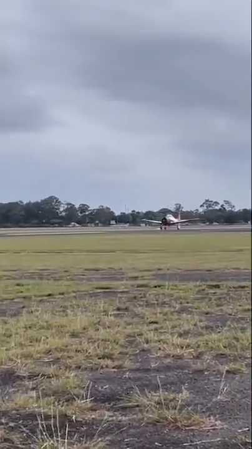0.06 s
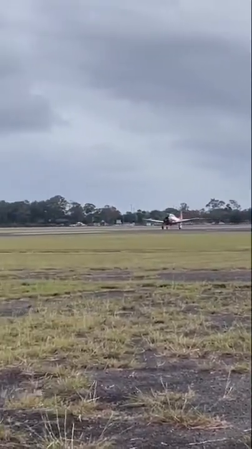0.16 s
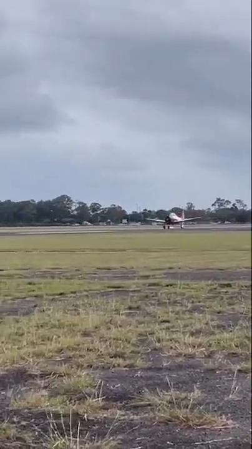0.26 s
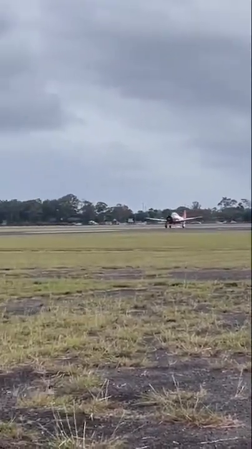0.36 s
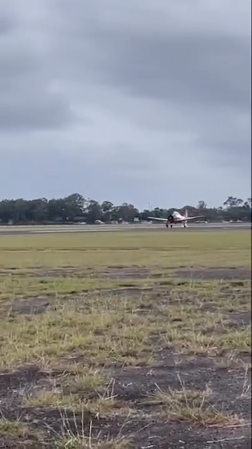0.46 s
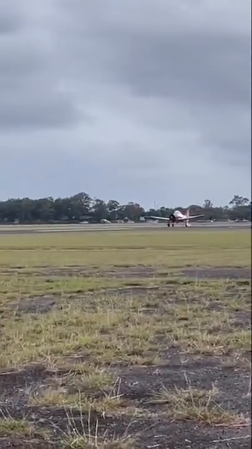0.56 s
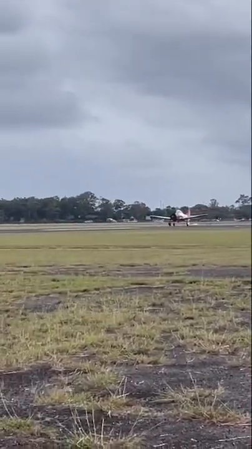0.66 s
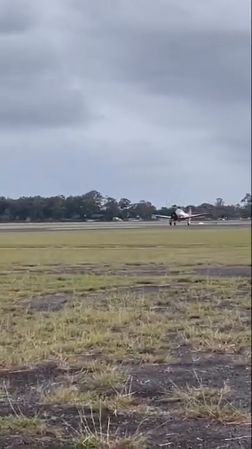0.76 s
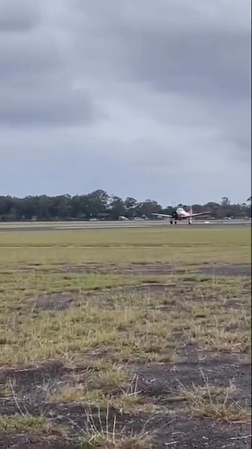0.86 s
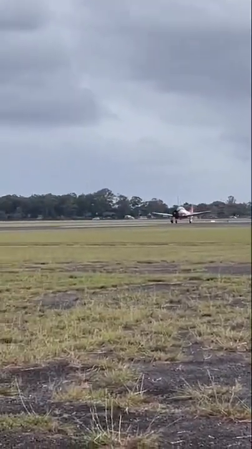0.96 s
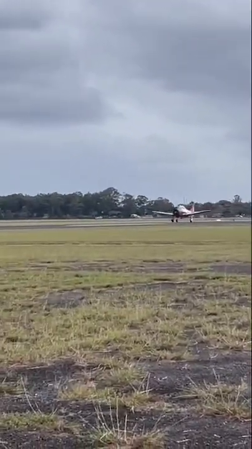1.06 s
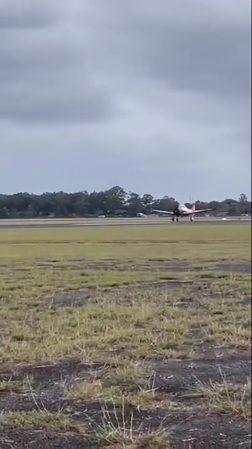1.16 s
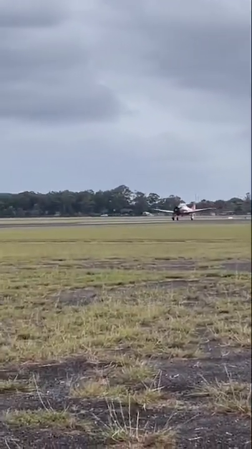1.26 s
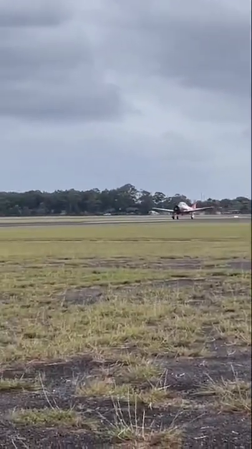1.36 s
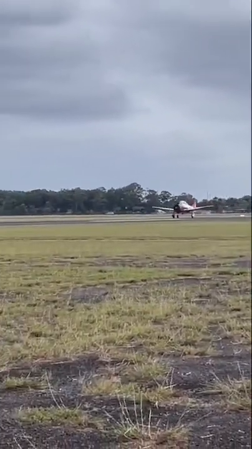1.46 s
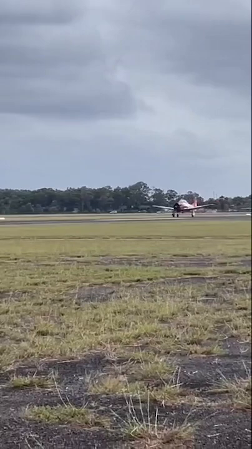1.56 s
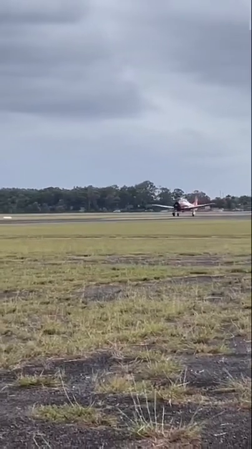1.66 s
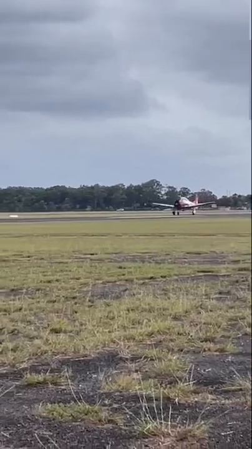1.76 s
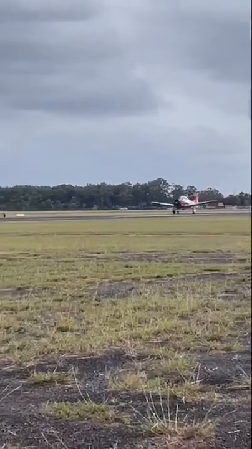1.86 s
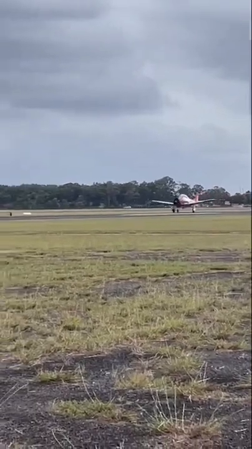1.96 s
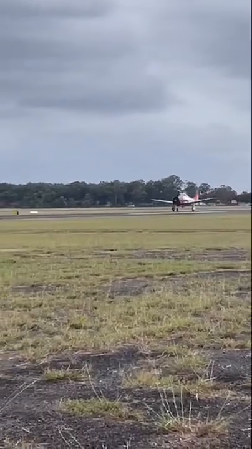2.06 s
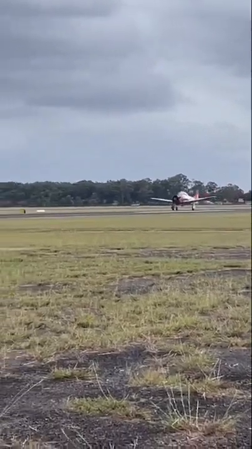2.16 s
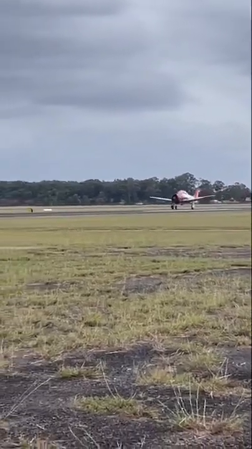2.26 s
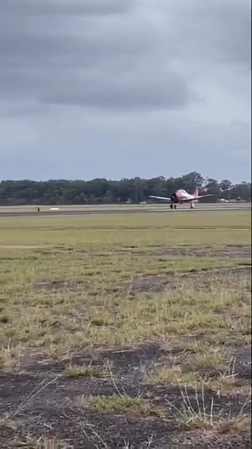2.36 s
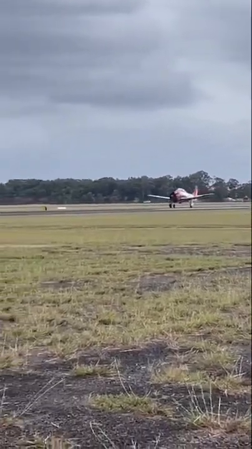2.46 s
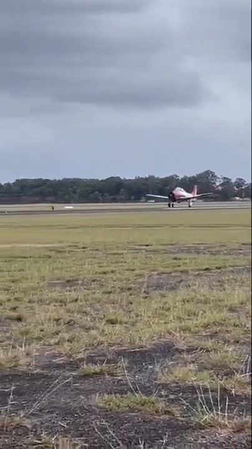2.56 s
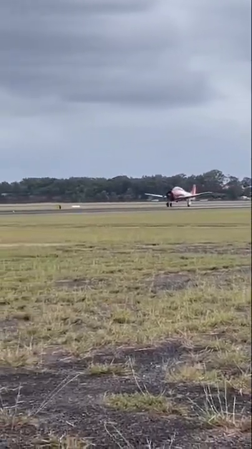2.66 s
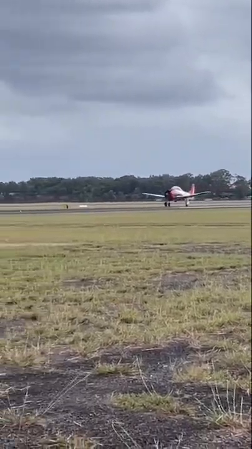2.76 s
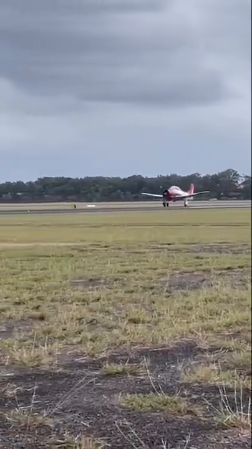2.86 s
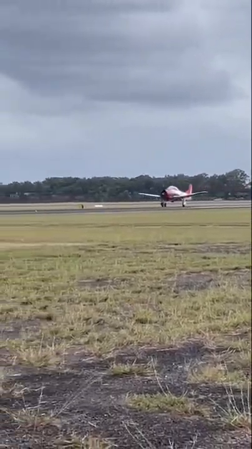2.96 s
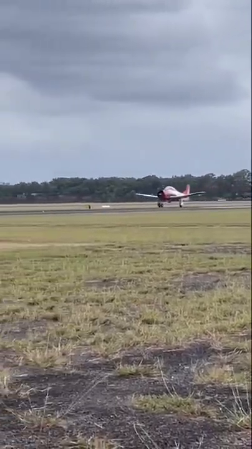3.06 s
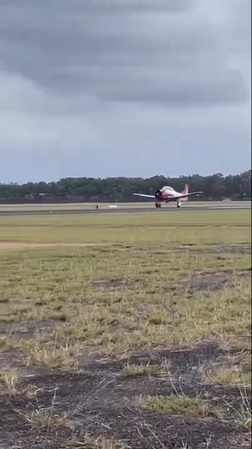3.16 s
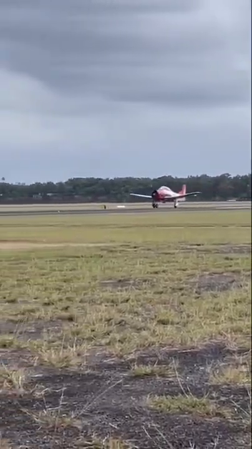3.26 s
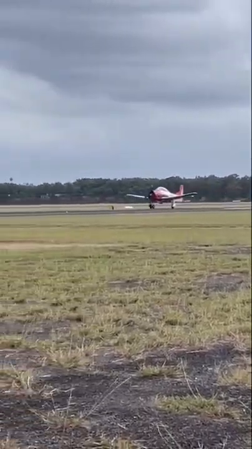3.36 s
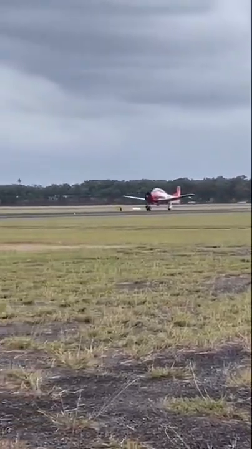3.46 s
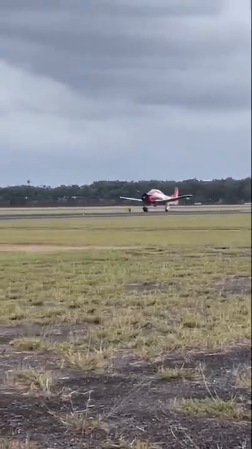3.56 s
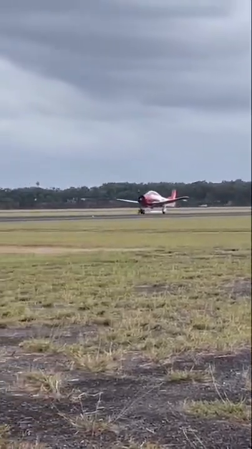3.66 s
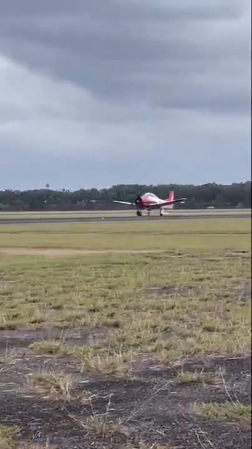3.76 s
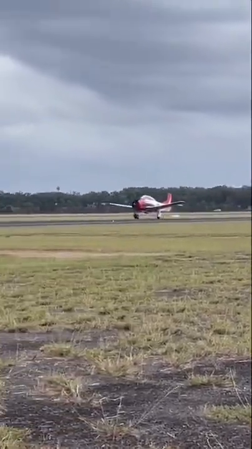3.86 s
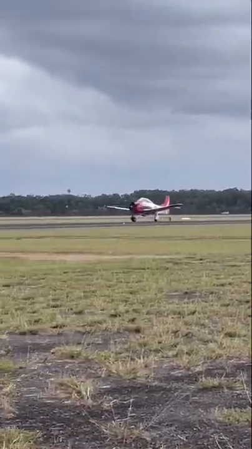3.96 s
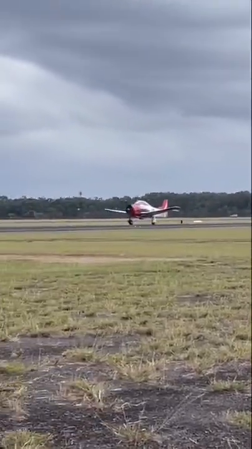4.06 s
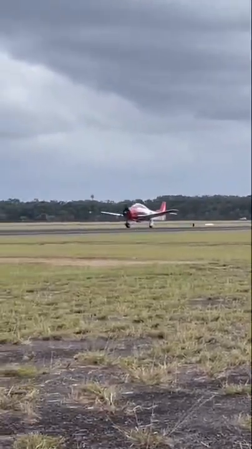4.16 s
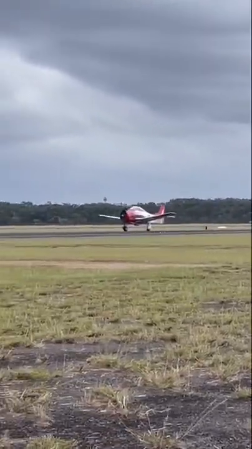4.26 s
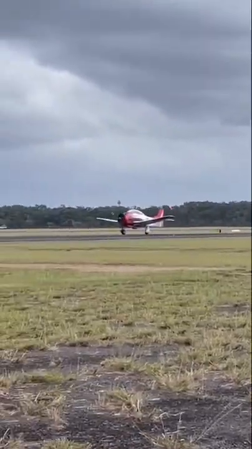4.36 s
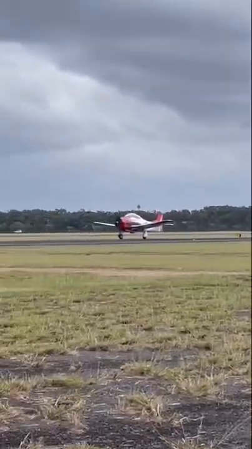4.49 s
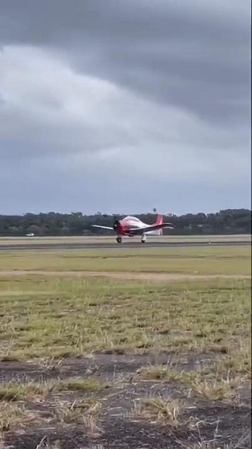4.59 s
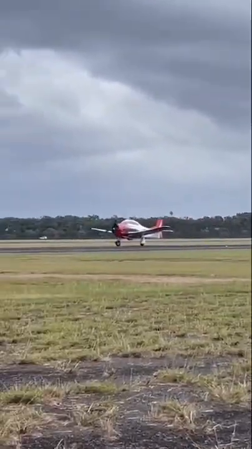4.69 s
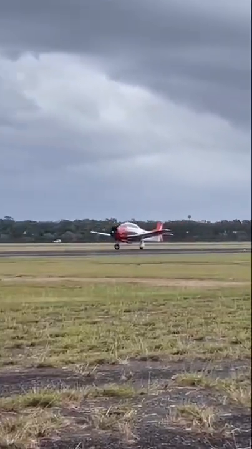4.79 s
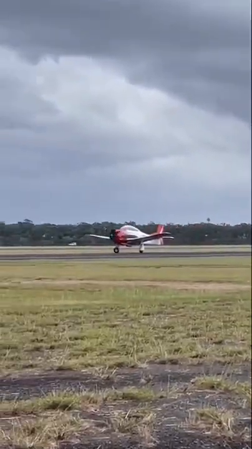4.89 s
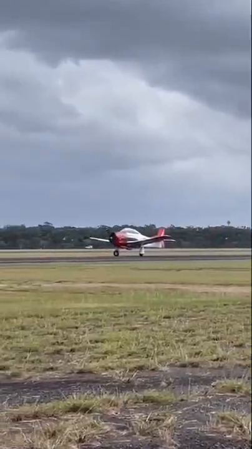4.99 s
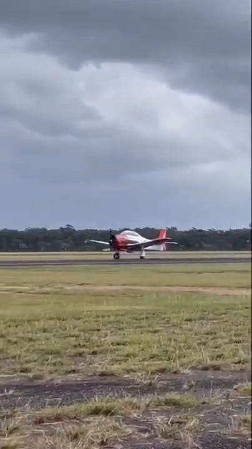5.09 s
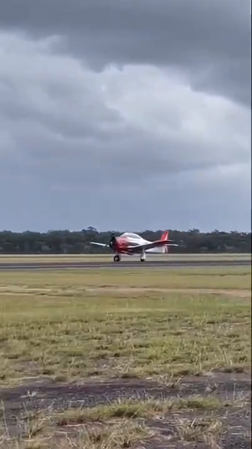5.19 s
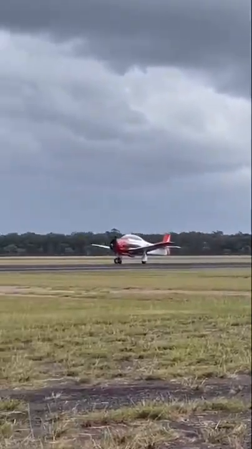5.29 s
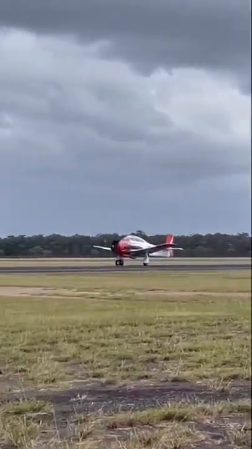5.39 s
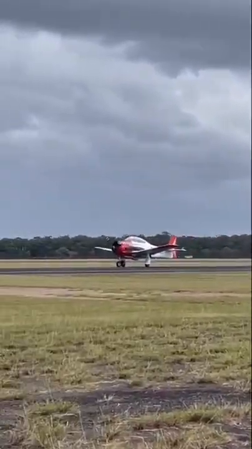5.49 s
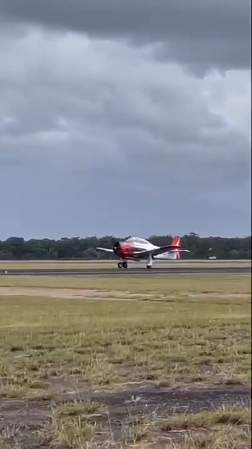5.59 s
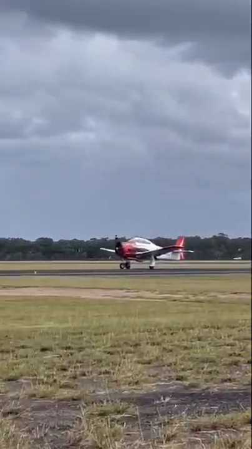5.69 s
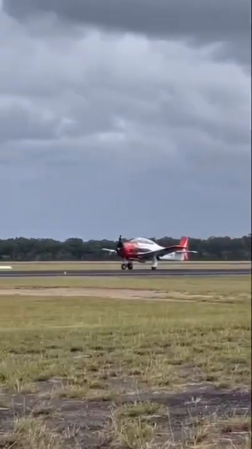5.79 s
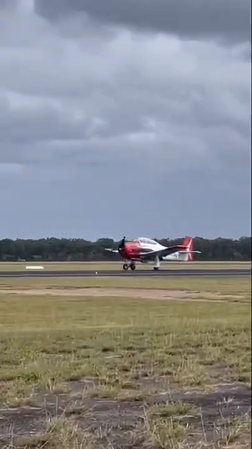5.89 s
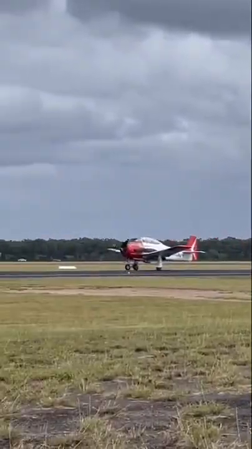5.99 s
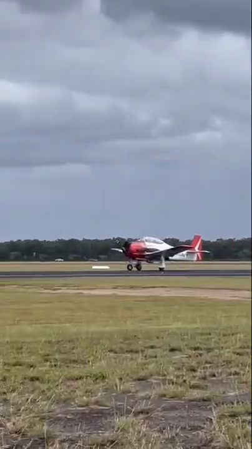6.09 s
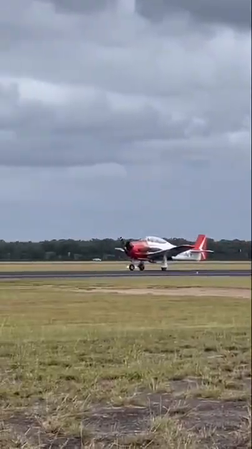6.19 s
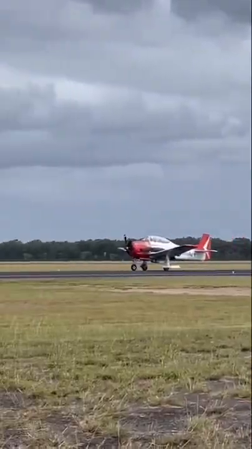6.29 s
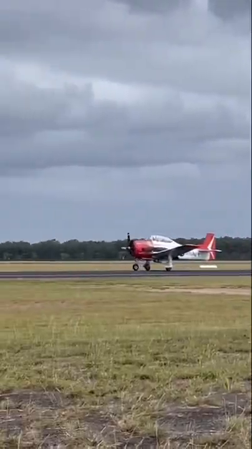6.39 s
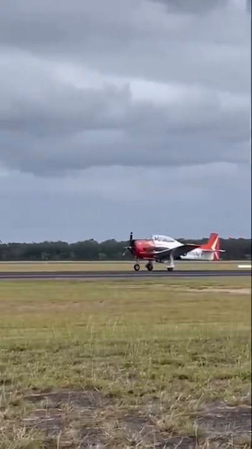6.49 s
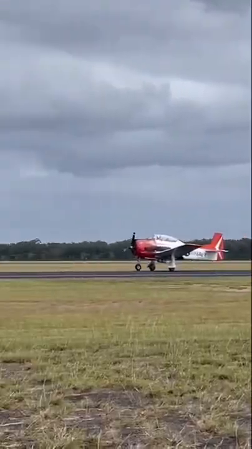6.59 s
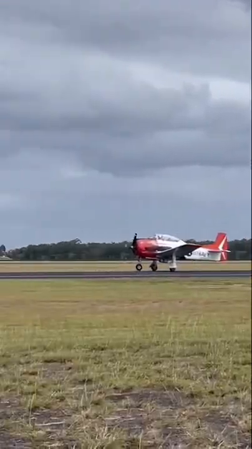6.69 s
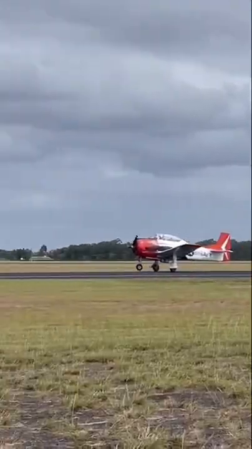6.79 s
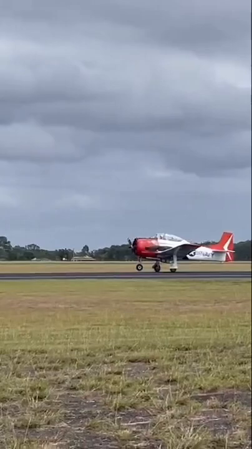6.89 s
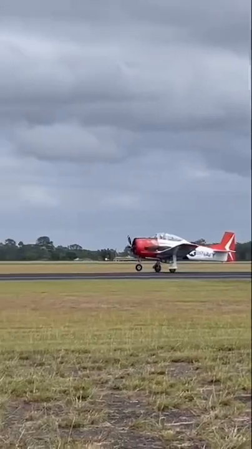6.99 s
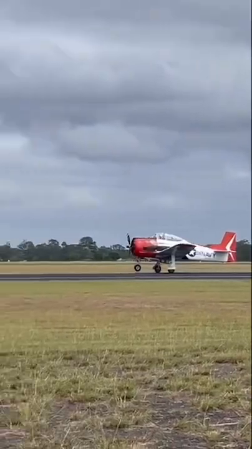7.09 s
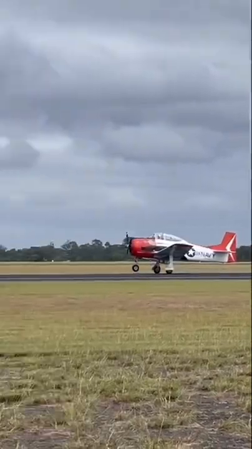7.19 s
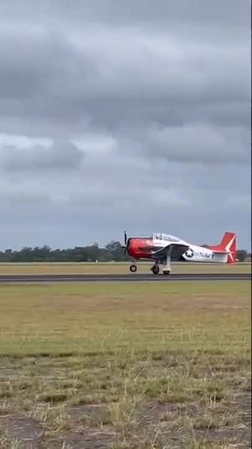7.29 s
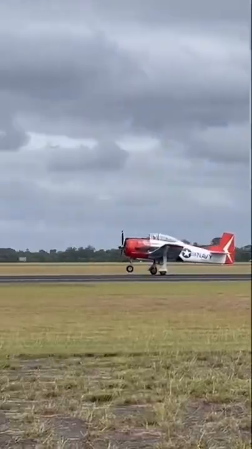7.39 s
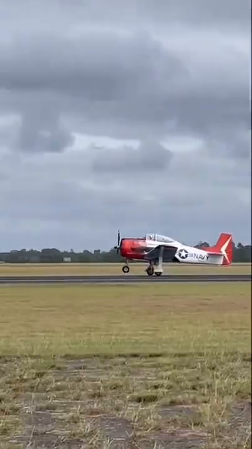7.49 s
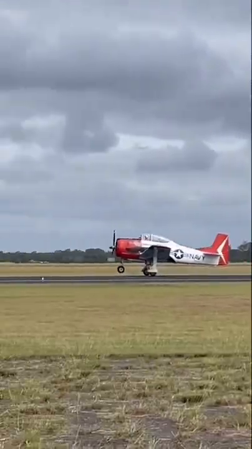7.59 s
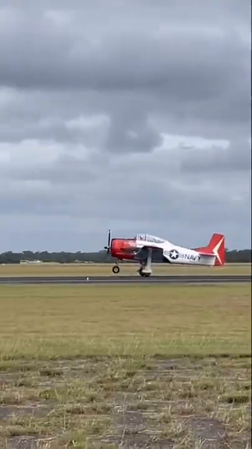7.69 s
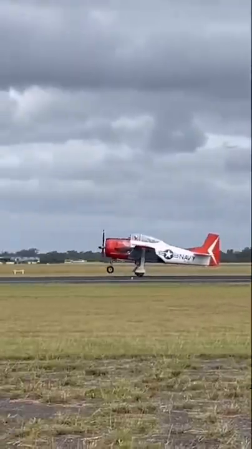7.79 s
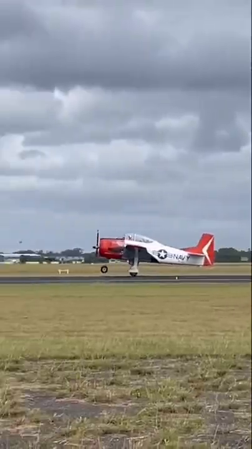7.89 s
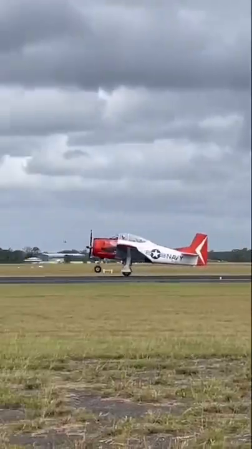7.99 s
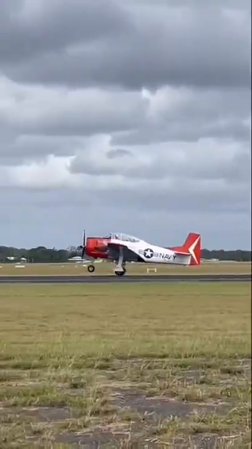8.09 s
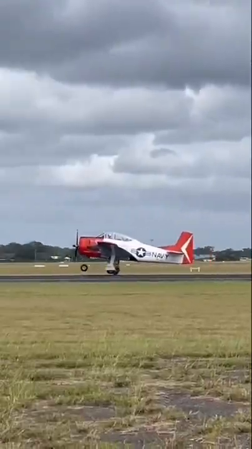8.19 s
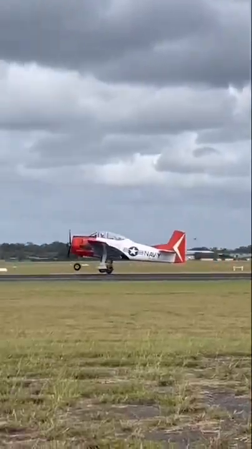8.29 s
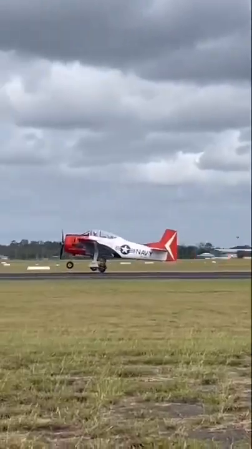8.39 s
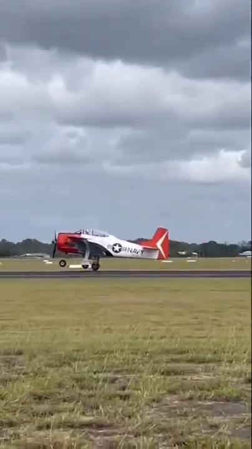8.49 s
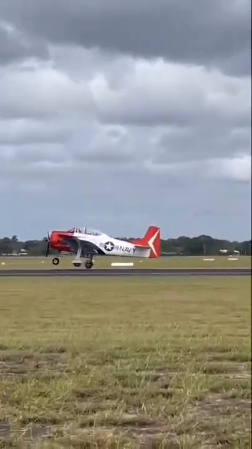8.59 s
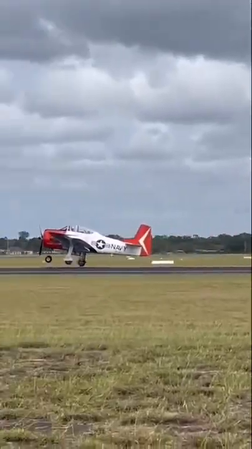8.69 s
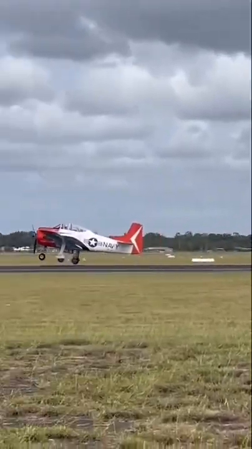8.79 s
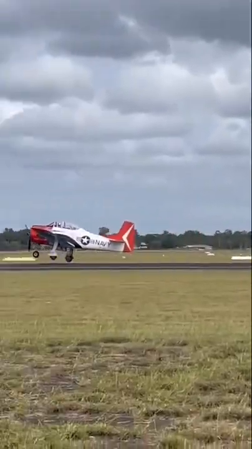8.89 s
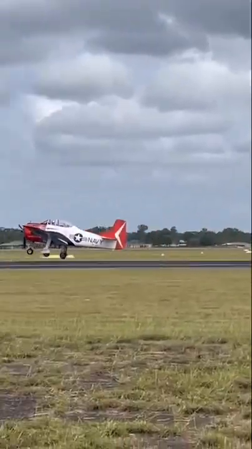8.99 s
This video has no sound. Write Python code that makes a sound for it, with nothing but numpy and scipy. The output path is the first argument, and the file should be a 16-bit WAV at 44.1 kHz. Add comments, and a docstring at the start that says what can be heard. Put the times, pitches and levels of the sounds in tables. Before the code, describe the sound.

A single-propeller aircraft with a big radial piston engine accelerates past a listener beside a runway. Gusts flutter and thump on the microphone before the engine takes over after four seconds. Its steady low drone grows into a full buzzing roar with hissing exhaust puffs. More wind thumps strike near the pass; afterwards the propeller wash fades, the pitch drops slightly, and a wavering, lumpy exhaust throb remains.

```python
"""A droning aeroplane with a nine-cylinder radial engine nears, passes close by and recedes on its take-off run.
Blade harmonics make the propeller drone; half-order tones and puffs of hiss make the exhaust throb and rasp
once a turn as the near cylinders fire. Orders of the engine whine ahead of it, and shaped noise
gives the roar of propeller wash. Wind buffets the microphone with noise, deep rumble and short thuds."""
import sys
import numpy as np
from scipy import signal
from scipy.fft import rfft, irfft
from scipy.io import wavfile
from scipy.ndimage import uniform_filter1d

SR = 44100
rng = np.random.default_rng(int(sys.argv[2]) if len(sys.argv) > 2 else 0)


def materialize(psi):
    """Save the field psi as 16-bit PCM at rate SR to the path in sys.argv[1].

    A 1-D psi becomes a single channel; in a 2-D psi each row is a channel.
    """
    bounded = np.clip(np.atleast_2d(psi).T, -1, 1)
    quanta = np.round(bounded * 32767).astype(np.int16)
    wavfile.write(sys.argv[1], SR, quanta)


N = 399105
TIME = np.arange(N) / SR
BINS = np.fft.rfftfreq(512, 1 / SR)  # Hz
FRAMES = np.arange(N // 128 + 5) * 128 / SR  # s

# Steady wind at the microphone. Each row: time in seconds, buffeting in dB before a shared lift, rumble in dB.
WIND_LEVELS = [(0, -47, -32.5), (1.22, -48, -29.5), (1.35, -32, -27), (1.75, -33.5, -26.5),
               (2.05, -34, -24), (2.45, -48, -34.5), (2.85, -45, -29), (3.15, -29.5, -23.5),
               (3.7, -35, -24), (4.05, -36.5, -29.5), (4.55, -36.5, -26), (5.15, -35.5, -26.5),
               (5.65, -33, -30), (6.4, -33.5, -26), (7.17, -39, -26), (7.26, -23.5, -21), (7.45, -25, -24),
               (7.75, -24.5, -23), (8.1, -29, -47), (9.05, -31, -44)]
# Swells of wind. Each row: start in seconds, length in seconds, level in dB before the buffet lift
# or rumble trim, brightness in dB before its spectral weighting.
WIND_SWELLS = [(0.065, 0.047, -38, -24), (0.382, 0.037, -26, -5), (0.447, .02, -30, -8),
               (0.547, 0.072, -26, -4), (0.665, 0.081, -28, 2), (0.771, 0.096, -31.5, 1.5),
               (0.888, .006, -23, -3), (0.915, 0.07, -28.5, 3), (1.012, .02, -33, 2),
               (1.041, 0.036, -28, 3), (1.127, 0.0077, -27.5, 8), (1.161, 0.023, -28.5, 3.5),
               (1.266, 0.04, -29, 1), (1.304, 0.13, -28, 5), (1.468, 0.015, -32, 0),
               (1.52, 0.031, -27.5, 6), (1.563, 0.031, -24, 6.5), (1.606, 0.029, -24, 6.5),
               (1.65, 0.064, -41, 9), (1.72, 0.025, -33, 4), (1.77, 0.053, -28.5, 2),
               (1.837, 0.024, -22, 5.5), (1.869, 0.045, -34, 8), (1.928, 0.027, -26, 2.5),
               (1.982, 0.04, -33, 7.5), (2.065, 0.028, -30.5, 8), (2.096, 0.078, -31, 7),
               (2.249, 0.012, -31, 7), (2.297, .055, -40, 8), (2.515, 0.012, -35.5, 11),
               (2.622, 0.093, -37, 4), (2.732, 0.022, -32.5, 10.5), (2.914, .01, -34.5, 8),
               (2.984, 0.058, -28, -0.5), (3.049, 0.019, -16, -2), (3.179, 0.0078, -24, -6),
               (3.26, 0.047, -21.5, -2.5), (3.418, 0.039, -28, 0), (3.51, .02, -32, 4),
               (4.186, 0.048, -23.5, -6), (4.898, 0.022, -23.5, -6), (5.175, 0.019, -22.5, -1.5),
               (5.284, 0.04, -21, -3), (7.236, 0.35, -40, 2), (8.112, 0.19, -26, 4.5),
               (8.396, 0.038, -26, 6.5), (8.567, 0.085, -28.5, 8), (8.71, 0.12, -25.5, 4)]
# Spectrum of the buffeting. Each row: frequency in Hz, relative level in dB per Hz.
BUFFET_SPECTRUM = [(30, -24), (70, 7), (130, 9.5), (220, 4.5), (350, 3.5), (650, 0.5), (1000, -6.5),
                   (1300, -11), (1650, -17), (2500, -35), (5000, -86), (9000, -91)]
# Spectrum of the wind rumble. Each row: frequency in Hz, relative level in dB per Hz.
RUMBLE_SPECTRUM = [(10, -44), (28, -23), (42, -1.5), (60, 2.5), (90, 0), (140, -5), (220, -16.5),
                   (500, -36), (1500, -94)]
# Likeness of the two channels of wind. Each row: frequency in Hz, correlation from -1 to 1.
WIND_CORRELATION = [(60, 0.87), (200, 0.9), (400, 0.86), (650, 0.98), (1000, 0.78), (1800, 0), (3000, 0.35)]
# The hardest eddies, and at 3.291 s the sharp snap of overload on the biggest one.
# Each row: peak time in seconds, level in dB, centre in Hz.
GUST_HITS = [(0.083, -15.5, 200), (0.088, -14, 114), (0.244, -20.5, 450), (0.391, -13, 754),
             (0.396, -17, 330), (0.432, -20, 171), (0.569, -18, 450), (0.644, -13, 290), (0.659, -10, 192),
             (0.675, -12, 600), (0.679, -11, 119), (0.736, -19, 650), (0.745, -15, 270), (0.888, -12, 740),
             (0.949, -22, 200), (1.324, -12, 130), (1.346, -15, 690), (1.366, -7, 920), (1.417, -13, 219),
             (1.435, -12, 460), (1.466, -14, 750), (1.528, -11, 750), (1.571, -19, 700), (1.619, -9.5, 730),
             (1.838, -11, 870), (1.852, -13, 380), (1.945, -13, 690), (2.078, -18, 336),
             (2.116, -14.5, 735), (2.998, -7.5, 190), (3.017, -15, 330), (3.037, -22, 290),
             (3.056, -8, 416), (3.066, -8.5, 212), (3.101, -12.5, 260), (3.147, -11.5, 290),
             (3.185, -8.5, 448), (3.221, -14.5, 1010), (3.271, -15, 150), (3.278, 0, 700), (3.283, -8, 160),
             (3.289, -5.5, 740), (3.29, 0, 327), (3.291, -17, 2390), (3.294, -3, 453), (3.298, -8.5, 177),
             (3.304, -21, 475), (3.422, -15, 504), (3.507, -8, 557), (3.723, -16, 375), (4.209, -13, 328),
             (5.189, -15, 199), (5.33, -12, 110), (7.246, -6.5, 366), (7.312, -8, 200), (7.355, -9, 150),
             (8.618, -12, 320), (8.649, -16, 260)]
# Roar of the propeller wash. Each row: time in seconds, level in dB.
ROAR_LEVEL = [(0, -45), (1.2, -39.5), (2.5, -42.5), (3.3, -33.5), (3.9, -28), (4.5, -27.5), (5, -29.5),
              (5.6, -25), (6.5, -23), (6.85, -26.5), (7.1, -20), (7.6, -29.5), (8, -35), (8.45, -48),
              (9.05, -51)]
# Spectrum of the roar. Each row: frequency in Hz, relative level in dB per Hz.
ROAR_SPECTRUM = [(40, -37), (70, 7.5), (180, 3.5), (280, -6.5), (430, -4), (580, 1), (690, 4), (800, 3),
                 (1000, -2), (1300, -2), (1900, -10.5), (3000, -16.5), (5000, -65)]
# Likeness of the two channels of roar and rasp. Each row: frequency in Hz, correlation from -1 to 1.
PLANE_CORRELATION = [(80, 1), (300, 0.4), (650, 0.55), (1100, 0.36), (1700, 0.97), (2300, 1), (3200, 0.99),
                     (4000, 1), (8000, 1), (9200, 1), (9800, -0.73), (11000, -0.75)]
# Crankshaft speed as heard, sagging with the Doppler shift. Each row: time in seconds, turns per second.
CRANK_SPEED = [(0, 46.6), (2.6, 46.8), (4, 47.4), (5, 47.5), (6, 47.4), (6.5, 47.24), (7, 46.88),
               (7.5, 46.24), (8, 45.2), (8.5, 44.2), (9.05, 43)]
# Loudness shared by propeller and exhaust tones. Each row: time in seconds, offset in dB.
TONE_LOUDNESS = [(0, -26), (2.6, -37), (3.3, -23), (3.65, -10), (4.3, -7.5), (4.9, -5.5), (5.3, -4),
                 (5.7, -3.5), (6.35, 1), (6.8, -2), (7.55, -0.5), (7.95, -5.5), (8.5, -3), (9.05, 1.5)]
# Whine of the approaching engine. Each row: time in seconds, level in dB.
WHINE_LEVEL = [(0, -58), (2.6, -51.5), (4, -44), (6, -44), (7, -46), (8, -58)]
# Tones of the whine. Each row: crank order, dB against the whine level.
WHINE_TONES = [(8, -2), (13.5, -4), (14.5, -2), (15.5, -1)]
# Level of the exhaust rasp. Each row: time in seconds, dB before flares and flutter.
RASP_LEVEL = [(0, -37), (1.06, -39), (2.6, -33.5), (3.285, -37), (3.305, -45), (3.93, -26.5), (4.7, -28.5),
              (5.1, -32.5), (5.55, -27), (6.2, -22.5), (6.68, -19.5), (6.86, -24.5), (7.1, -25), (7.3, -24),
              (7.55, -26), (7.9, -23.5), (8.07, -28), (8.47, -30.5), (8.7, -30), (9.05, -23)]
# Spectrum of the rasp before tilt, notch and patches. Each row: frequency in Hz, relative level in dB per Hz.
RASP_SPECTRUM = [(650, -12), (1100, 0), (1380, -3), (2140, -1), (2510, -3), (3000, 0), (4100, -3.5),
                 (4710, -3.5), (6260, -6), (7690, -10), (8910, -6), (10400, -7), (11200, -20), (11500, -23),
                 (15000, -50), (22000, -120)]
# How distinct the single firings are. Each row: time in seconds, share from 0 to 1.
FIRING_CONTRAST = [(0, 0.1), (3.8, 0.29), (5.8, 0.25), (6.3, 0.24), (6.6, 0.54), (7.5, 0.66), (8.1, 0.77),
                   (9.05, 0.86)]
# Loudness of the nine cylinders in firing order. Each entry: dB before scatter and contrast.
CYLINDER_DB = [6, 8.5, -11.5, -20, 6.5, 6.5, -1, -15, -9.5]
# The exhaust flares up for a few firings. Each row: centre in seconds, half length in seconds, gain in dB.
EXHAUST_FLARES = [(6.57, 0.042, 1), (7.1, 0.089, 3.5), (7.62, 0.063, 5), (7.775, 0.011, 2),
                  (7.957, 0.018, 2), (8.531, 0.011, 4), (8.728, 0.042, 6.5), (8.832, 0.028, 3),
                  (9.003, 0.009, 4)]
# Single hard exhaust cracks. Each row: time in seconds, level in dB, brightness (top against bottom) in dB.
EXHAUST_CRACKS = [(6.524, -22, 10), (6.585, -19, -1), (6.7323, -14, 3), (6.776, -32, -10), (6.988, -23, -7),
                  (7.030, -20, -6), (7.072, -19, -7), (7.094, -18, 9), (7.116, -21, 12), (7.5438, -23, 11),
                  (7.592, -18.5, 9), (7.6311, -27, 13), (7.654, -27, -3), (7.738, -20, 8),
                  (7.763, -15.5, -10), (7.785, -22, -9), (7.871, -25, -5), (7.919, -27, -6),
                  (7.940, -17, 0), (8.425, -33, -10), (8.540, -23, -10), (8.86, -24.5, -13),
                  (8.933, -29, 5), (8.979, -27, 0), (8.997, -22, -6), (9.029, -31, -2)]
# Leading exhaust tones, the last being the firing tone. Each row: level in dB, gain astern in dB,
# lobe gain in dB, lobe bearing from the nose in degrees, lobe width in degrees.
THROB_BEAMS = [(-34, -9, 6, 39, 17), (-25, -4, -10.5, 47, 11.7), (-33.5, 6.5, 12, 50.4, 13)]
# Crank orders of those tones, in the same order. Each entry: cycles per turn.
LEADING_ORDERS = [1, 3.5, 4.5]
# Further exhaust tones that follow the firing tone. Each row: crank order, dB against it before a shared trim.
FOLLOWING_TONES = [(1.5, -3.5), (2.5, -4), (3, 2.5), (5, -9), (6.5, -7), (7, -7), (7.5, -11), (11.5, -11)]
# Propeller drone: blade harmonics 1 to 4, then all higher ones. Each row: level in dB, gain astern in dB,
# lobe gain in dB, lobe bearing from the nose in degrees, lobe width in degrees.
DRONE_BEAMS = [(-21, -0.1, 4.5, 43, 11.4), (-21.5, 4.5, -17, 34.2, 2.8), (-37, 1.5, 11.5, 82, 43),
               (-42, -2.5, 19, 84, 21), (-49, 6, 17.5, 83, 23)]
# Blade harmonics 5 and up. Each entry: dB against their shared level.
UPPER_HARMONICS_DB = [-1, 2, -1.5, -6.5, -9, -6.5, -11]
# Corner below which the bass narrows to mono. Each row: time in seconds, frequency in Hz.
MONO_CORNER = [(1.1, 25), (1.2, 252), (1.6, 690), (2.2, 860), (5.7, 940), (6.5, 555), (7, 337), (7.5, 176),
               (8.1, 45)]

BLADES_PER_TURN = 1.996
ABEAM_S, ABEAM_M_PER_S = 7.655, 33.8  # when the aeroplane is abeam, and its speed there
ACCELERATION_M_PER_S2, RUNWAY_M = 2.77, 49.3  # RUNWAY_M is the distance off to the side
WAKE_DB, WAKE_RAD, WAKE_PER_S = 2.2, .2, 7  # shaking of level and phase (rms), and its rate
BRIGHT_DB, DULLING_DB_PER_M = 8, 0.1251  # rasp brightness and its loss in air, before spectral weighting
FLUTTER_DB, FLUTTER_PER_S = 1.8, 2.7  # rms depth at full firing contrast, and rate
SWELL_ATTACK_SHARE, SWELL_RELEASE_S = 0.15, 0.009  # a longer swell takes longer to build
SWELL_RUMBLE_DB = -6
EDGE_HZ = 11200


def amp(db):
    """Decibels to gain."""
    return 10 ** (np.asarray(db) / 20)


def unit(x):
    """Scales to rms 1."""
    return x / np.sqrt(np.mean(x ** 2) + 1e-20)


def curve(rows, axis=1, t=TIME):
    """One column of a time table, joined by straight lines."""
    rows = np.asarray(rows)
    return np.interp(t, rows[:, 0], rows[:, axis])


def colour(points):
    """A spectrum table read at every frequency bin, on a log frequency scale."""
    hz, value = np.transpose(points)
    return np.interp(np.log(BINS + 1), np.log(hz + 1), value)


def wander(rate):
    """Smooth random drift of rms 1 that moves up to about rate times a second."""
    hz = np.fft.rfftfreq(N // 20, 20 / SR)
    spectrum = rfft(rng.standard_normal(N // 20)) / (1 + (hz / rate) ** 4)
    slow = irfft(spectrum)
    return np.interp(TIME, np.arange(len(slow)) * 20 / SR, unit(slow))


def noise(field_db, correlation):
    """Stereo noise with a given spectrum and channel likeness; the channel mean is scaled to rms 1."""
    a, b, c, d = rng.standard_normal((4, len(FRAMES), len(BINS)))
    same = np.clip(colour(correlation), -1, 1)
    mid = (a + 1j * b) * np.sqrt((1 + same) / 2)
    side = (c + 1j * d) * np.sqrt((1 - same) / 2)
    z = np.array([mid + side, mid - side]) * amp(field_db)
    x = signal.istft(z.transpose(0, 2, 1), nperseg=512, noverlap=384)[1][:, :N]
    return x / np.std(x.mean(0))


def bass_cut(x, hz):
    """Steep high-pass."""
    return signal.sosfilt(signal.butter(4, hz, "high", fs=SR, output="sos"), x)


def bursts(times, levels_db, rise, fall):
    """An envelope with a quick swell and decay (time constants in seconds) at every event."""
    envelope, t = np.zeros(N), np.arange(-256, 2048) / SR
    shape = np.exp(np.minimum(t / rise, -t / fall))
    for s, db in zip(times, levels_db):
        part = envelope[round((s + t[0]) * SR):][:len(t)]
        part += (amp(db) * shape)[:len(part)]
    return envelope


def swells():
    """Gain and brightness in dB of the wind swells: each rises quickly, holds and dies away."""
    power, bright = np.zeros(N), np.zeros(N)
    for start, length, db, bright_db in WIND_SWELLS:
        attack = np.clip((TIME - start) / (SWELL_ATTACK_SHARE * length) + .5, 0, 1)
        release = np.exp(-np.clip((TIME - start - length) / SWELL_RELEASE_S, 0, 20))
        power += (amp(db) * attack * release) ** 2
        bright += bright_db * attack * release
    return np.sqrt(power), np.interp(FRAMES, TIME, bright)


def wind_buffet(swell, bright_db, lumpy_db=1.66, crackle_db=2.6, lift_db=4):
    """Eddies break on the microphone ports: noise sputters under slow lumps and fast crackle."""
    eddies = unit(amp(lumpy_db * np.minimum(wander(31), 2) + crackle_db * wander(290)))
    tilt = colour([(150, -0.19), (420, -0.14), (1200, 1.18), (2200, 2.12)])
    field_db = colour(BUFFET_SPECTRUM) + bright_db[:, None] * tilt
    sputter = bass_cut(noise(field_db, WIND_CORRELATION) * eddies, 45.0)
    return sputter * amp(lift_db) * np.hypot(amp(curve(WIND_LEVELS)), swell)


def wind_rumble(swell, apart=0.13, heave_db=0.2):
    """Deep noise under the buffets, nearly mono, rising with the swells."""
    hz, db = np.transpose(RUMBLE_SPECTRUM)
    shape = amp(np.interp(np.log(np.fft.rfftfreq(N, 1 / SR) + 1), np.log(hz), db))
    mid, side = unit(irfft(rfft(rng.standard_normal((2, N))) * shape, N))
    steady = amp(curve(WIND_LEVELS, axis=2) + heave_db * wander(2.8))
    level = np.hypot(steady, amp(SWELL_RUMBLE_DB) * swell)
    return np.array([mid + apart * side, mid - apart * side]) * level


def wind():
    """Buffets and rumble driven by the same swells."""
    swell, bright_db = swells()
    return wind_buffet(swell, bright_db) + wind_rumble(swell)


def gusts(cycles=0.75, spray=0.21, rise=0.00039, fall=0.006, reach_hz=600, apart=1.0):
    """Each hit is a compact thud of a cycle or two and a short spray of noise; small eddies sound higher."""
    out, t = np.zeros((2, N)), np.arange(-1024, 1024) / SR
    envelope = np.exp(np.minimum(t / rise, -t / fall))
    for s, db, hz in GUST_HITS:
        thud = np.exp(-(t * hz / cycles) ** 2) * np.cos(2 * np.pi * (hz * t + rng.random()))
        band = signal.butter(4, [hz / 2, min(hz + reach_hz, SR / 4)], "band", fs=SR, output="sos")
        mid, side = unit(signal.sosfilt(band, rng.standard_normal((2, len(t))))) * envelope
        hit = amp(db) * (thud + spray * np.array([mid + apart * side, mid - apart * side]))
        part = out[:, round(s * SR) - len(t) // 2:][:, :len(t)]
        part += hit[:, :part.shape[1]]
    return out


def roar(turns):
    """Churned air behind the propeller, pulsing with the blades; from far off it has a hollow ring."""
    far = np.interp(FRAMES, [3, 6.3], [1, 0])[:, None]
    hollow_db = colour([(300, 5.0), (440, 1.0), (560, -1), (680, 5.5), (800, -1.5), (950, -1.0), (1300, 2.5)])
    pulse = 1 + 0.5 * np.cos(2 * np.pi * BLADES_PER_TURN * turns)
    wash = noise(colour(ROAR_SPECTRUM) + far * hollow_db, PLANE_CORRELATION)
    return bass_cut(wash * pulse, 44) * amp(curve(ROAR_LEVEL) + wander(27))


def flight(t=TIME):
    """Distance in metres and bearing from the nose in degrees, as the aeroplane gathers speed."""
    since = t - ABEAM_S
    along = ABEAM_M_PER_S * since + ACCELERATION_M_PER_S2 * since ** 2 / 2
    return np.hypot(along, RUNWAY_M), np.degrees(np.arctan2(RUNWAY_M, -along))


def beamed(level_db, astern_db, lobe_db, lobe_deg, width_deg):
    """Level in dB of a tone that tilts from nose to tail, with a lobe or notch sweeping over the listener."""
    bearing = flight()[1]
    lobe = np.exp(-((bearing - lobe_deg) / width_deg) ** 2)
    return curve(TONE_LOUDNESS) + level_db - astern_db * np.cos(np.radians(bearing)) + lobe_db * lobe


def tone(turns, order, level_db, waver_db, smear=0.061, spread=0.13):
    """One line of a rotating source, shaken by the air and the wake; it reaches one port a little earlier."""
    wake = np.clip((TIME - ABEAM_S) / .5, 0, 1)  # sets in once the aeroplane is past
    shake = smear * wander(2.2) + WAKE_RAD * wake * wander(WAKE_PER_S)  # radians
    phase = 2 * np.pi * (order * turns + rng.random()) + shake
    level = amp(level_db + waver_db * wander(3) + WAKE_DB * wake * wander(WAKE_PER_S))
    lead = min(spread * np.sqrt(order), np.pi / 5) * np.array([[1], [-1]])  # radians
    return np.sqrt(2) * level * (np.cos(phase) - np.tan(lead) * np.sin(phase))


def far_whine(turns):
    """Higher engine orders that carry ahead of the aeroplane, shaken by the long path through the air."""
    level_db = curve(WHINE_LEVEL)
    return sum(tone(turns, order, level_db + db, waver_db=3.5, smear=1.1) for order, db in WHINE_TONES)


def firing_puffs(turns, scatter_db=1.3, decay_s=0.0036):
    """Each exhaust valve snaps open and its puff dies away under the next one."""
    shot = (turns * 4.5 + 5.6).astype(int)  # nine firings in two turns
    scatter = scatter_db * rng.standard_normal(shot.max() + 1)[shot]
    shot_db = np.array(CYLINDER_DB)[shot % len(CYLINDER_DB)] + scatter
    kicks = (np.diff(shot, prepend=0) > 0) * amp(shot_db) ** 2
    power = signal.lfilter([1], [1, -np.exp(-1 / (decay_s * SR))], kicks)
    puffs = uniform_filter1d(power ** (curve(FIRING_CONTRAST) / 2), size=110)
    return puffs / np.sqrt(uniform_filter1d(puffs ** 2, size=7600))  # evens out the running level


def cracks(hiss, split_hz=5500, rise=0.001, fall=0.0051):
    """The hardest firings: short blasts of hiss, some dark and some bright."""
    top = signal.sosfiltfilt(signal.butter(2, split_hz, "high", fs=SR, output="sos"), hiss)
    s, db, bright_db = np.transpose(EXHAUST_CRACKS)
    dark = (hiss - top) * bursts(s, db - bright_db / 2, rise, fall)
    return dark + top * bursts(s, db + bright_db / 2, rise, fall)


def exhaust_hiss(patchy_db=2.3, notch_db=5):
    """Turbulent exhaust noise, dulled by distance as air absorbs the top."""
    bright_db = BRIGHT_DB - DULLING_DB_PER_M * flight(FRAMES)[0][:, None]
    tilt = bright_db * colour([(1500, -0.13), (3000, 0.04), (5000, 0.34), (8000, 0.69), (11000, 2.07)])
    # from about abeam onward, an echo off the ground hollows out the middle
    passed = np.interp(FRAMES, [7, 7.9], [0, 1])[:, None]
    notch = notch_db * passed * colour([(800, 0.7), (1300, 1.0), (1800, -0.26), (2600, -0.34), (4000, -0.11)])
    # turbulence makes patches of the spectrum come and go
    patches = uniform_filter1d(rng.standard_normal(tilt.shape), size=14, axis=0)
    patches = unit(uniform_filter1d(patches, size=6, axis=1))
    patches *= patchy_db * (0.36 + curve(FIRING_CONTRAST, t=FRAMES))[:, None]
    return noise(colour(RASP_SPECTRUM) + tilt - notch + patches, PLANE_CORRELATION)


def exhaust_rasp(turns):
    """Each firing lets out a puff of hiss, more distinct and fluttering as the firing contrast grows."""
    hiss = exhaust_hiss()
    flare_db = sum(db * np.exp(-((TIME - s) / half) ** 2) for s, half, db in EXHAUST_FLARES)
    flutter_db = FLUTTER_DB * curve(FIRING_CONTRAST) * wander(FLUTTER_PER_S)
    level = amp(curve(RASP_LEVEL) + flare_db + flutter_db)
    return hiss * level * firing_puffs(turns) + cracks(hiss)


def exhaust_throb(turns):
    """Unequal cylinders repeat every two turns, so tones stand on half orders."""
    levels = [beamed(*row) for row in THROB_BEAMS]
    leading = sum(tone(turns, order, db, waver_db=1, smear=.1) for order, db in zip(LEADING_ORDERS, levels))
    trimmed_db = levels[-1] - 1.5  # the firing tone, less the shared trim
    following = sum(tone(turns, order, trimmed_db + db, waver_db=1.0) for order, db in FOLLOWING_TONES)
    return leading + following


def propeller(turns):
    """Blade-passage harmonics; the upper ones waver more and carry mostly near the plane of the blades."""
    blades = turns * BLADES_PER_TURN
    *levels, upper_db = [beamed(*row) for row in DRONE_BEAMS]
    low = sum(tone(blades, k, db, waver_db=.55 * k, smear=.06 * k) for k, db in enumerate(levels, 1))
    high = sum(tone(blades, k, upper_db + db, waver_db=2.5, smear=.3)
               for k, db in enumerate(UPPER_HARMONICS_DB, 5))
    return low + high


def scene():
    """The wind, and the aeroplane driven by its crankshaft."""
    turns = np.cumsum(curve(CRANK_SPEED)) / SR
    air = wind() + gusts() + roar(turns)
    engine = far_whine(turns) + exhaust_rasp(turns) + exhaust_throb(turns)
    return air + engine + propeller(turns)


def record(dry):
    """The bass narrows to mono, peaks are rounded off at full scale; then the band limit."""
    hz, t, z = signal.stft((dry[0] - dry[1]) / 2, SR, nperseg=2048)
    z = z / np.sqrt(1 + (curve(MONO_CORNER, t=t) / (hz[:, None] + 1)) ** 16)
    side = signal.istft(z, SR, nperseg=2048)[1][:N]
    x = dry.mean(0) + np.array([side, -side])
    held = x / (1 + x ** 6) ** (1 / 6)
    low_pass = signal.firwin(127, EDGE_HZ, window=("kaiser", 9), fs=SR)
    return signal.oaconvolve(held, low_pass[None], "same")


dry = scene()
out = record(dry)
materialize(out)
```